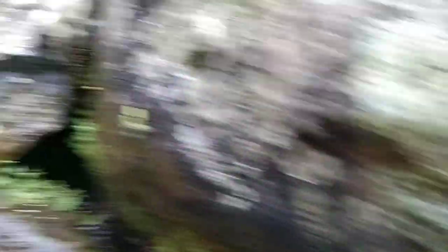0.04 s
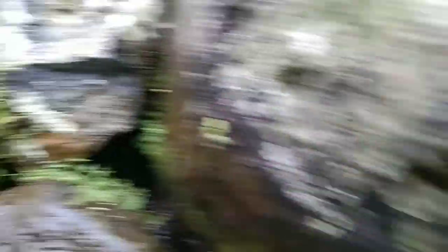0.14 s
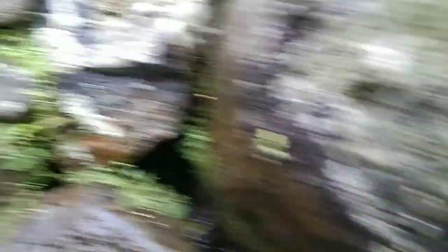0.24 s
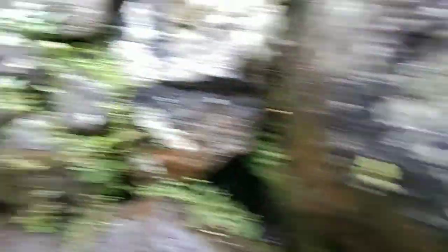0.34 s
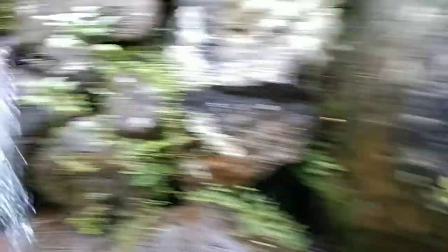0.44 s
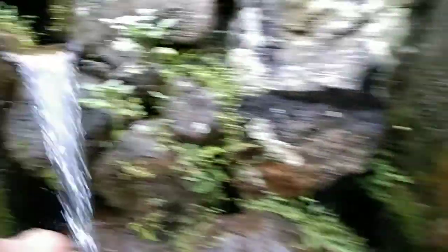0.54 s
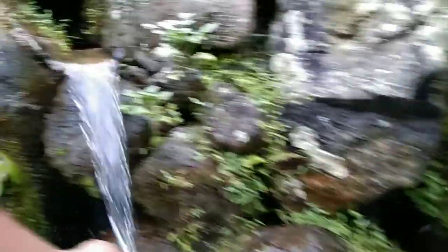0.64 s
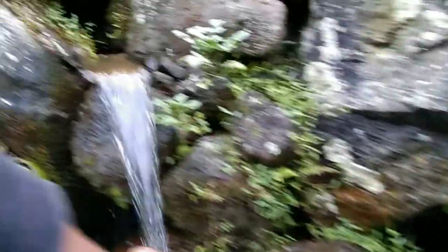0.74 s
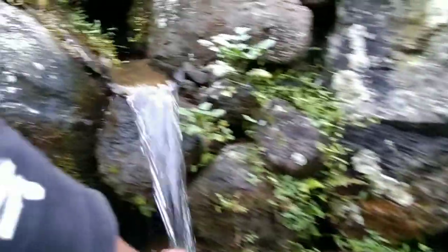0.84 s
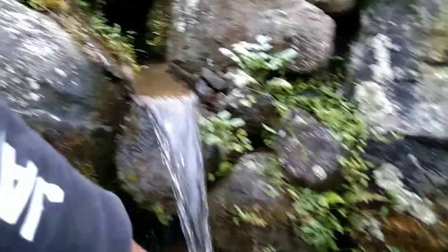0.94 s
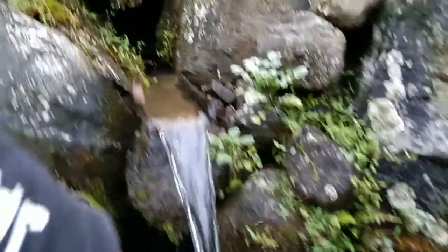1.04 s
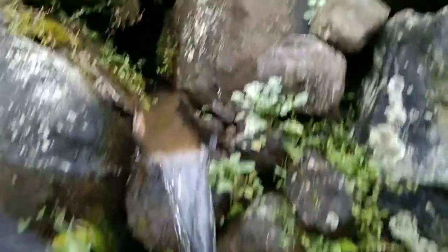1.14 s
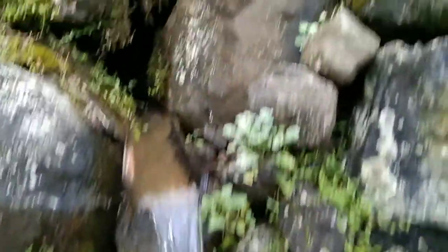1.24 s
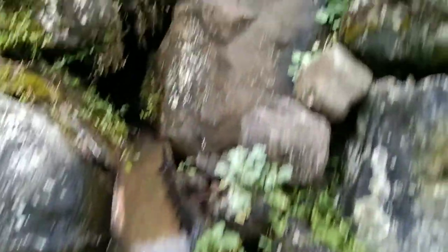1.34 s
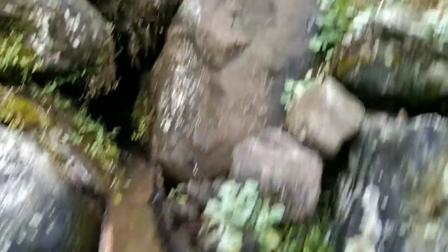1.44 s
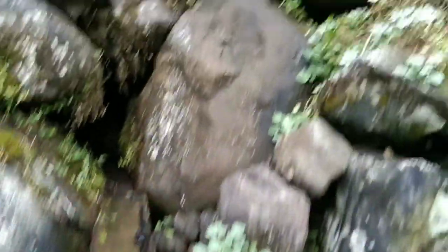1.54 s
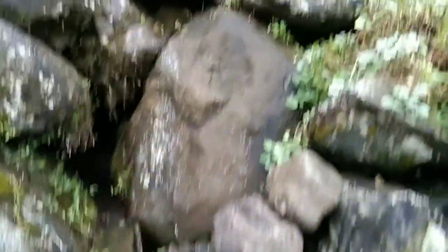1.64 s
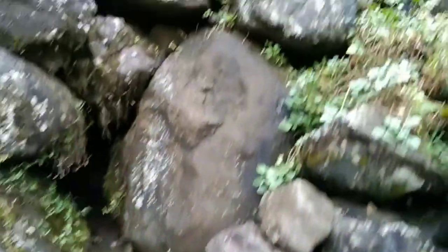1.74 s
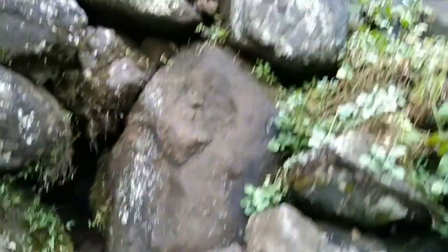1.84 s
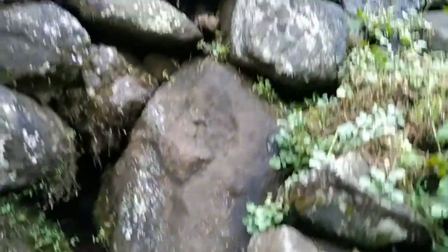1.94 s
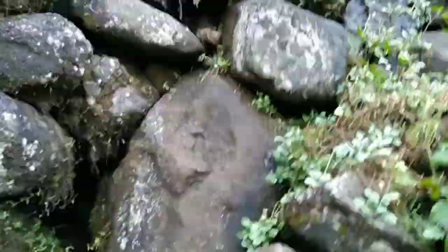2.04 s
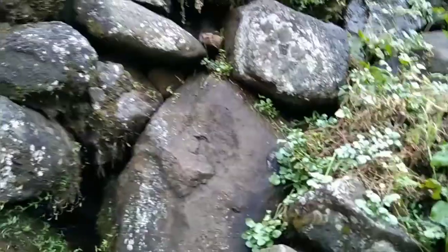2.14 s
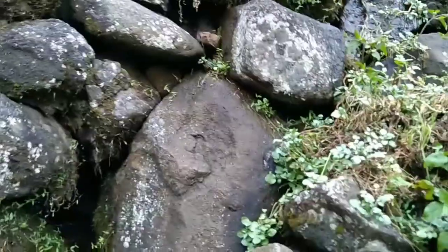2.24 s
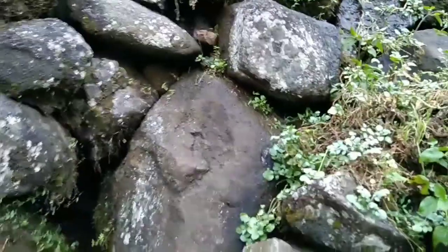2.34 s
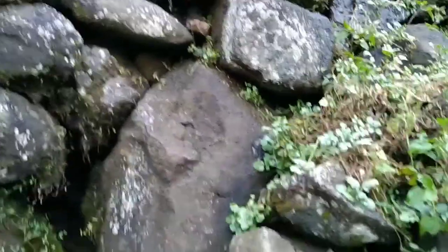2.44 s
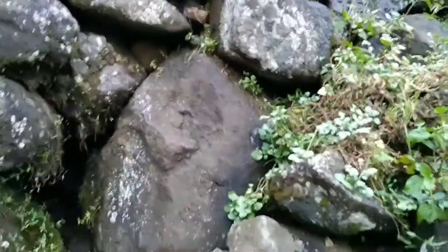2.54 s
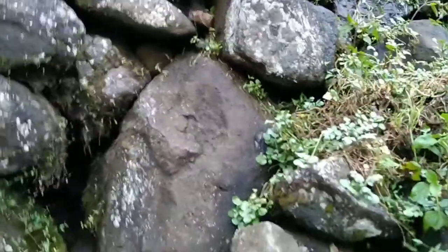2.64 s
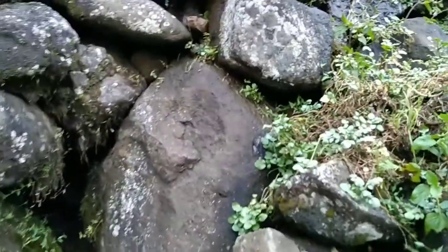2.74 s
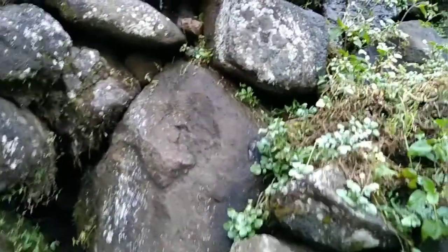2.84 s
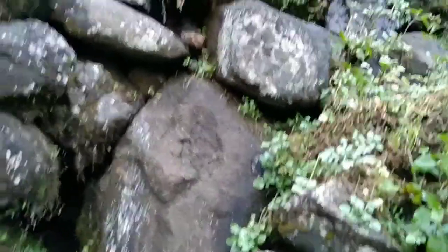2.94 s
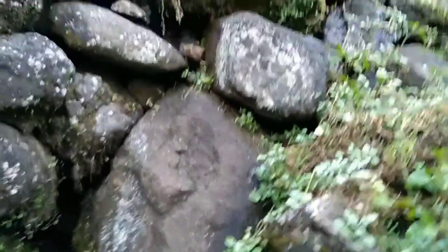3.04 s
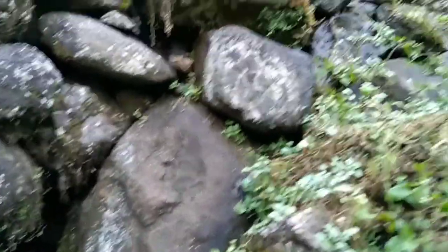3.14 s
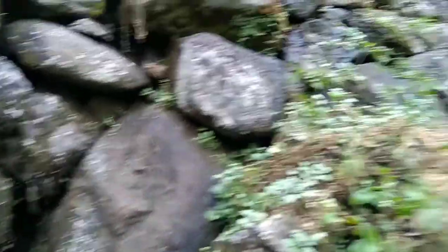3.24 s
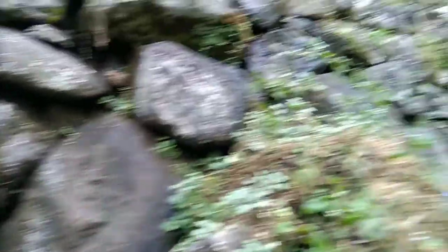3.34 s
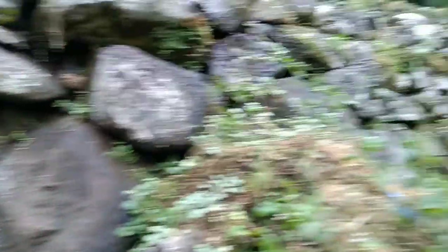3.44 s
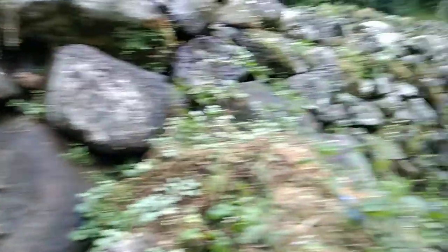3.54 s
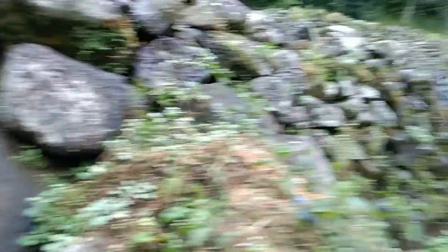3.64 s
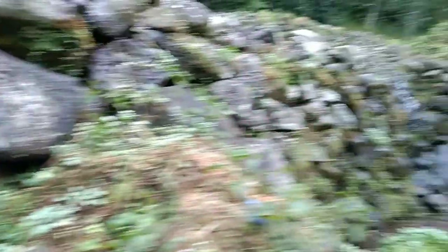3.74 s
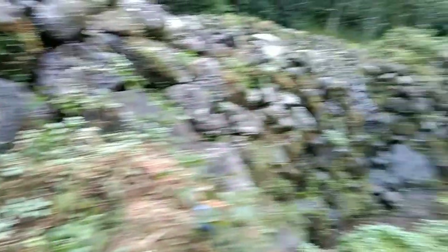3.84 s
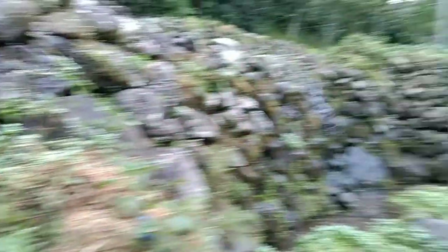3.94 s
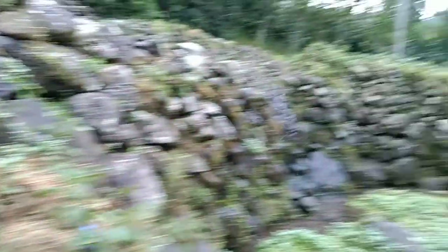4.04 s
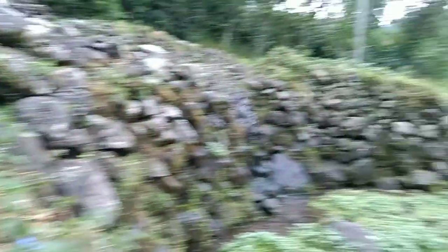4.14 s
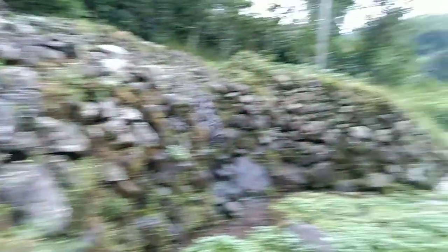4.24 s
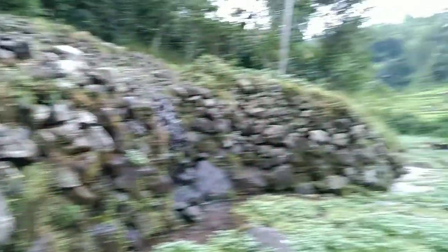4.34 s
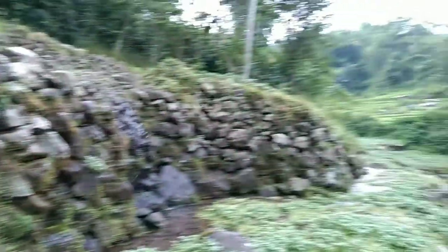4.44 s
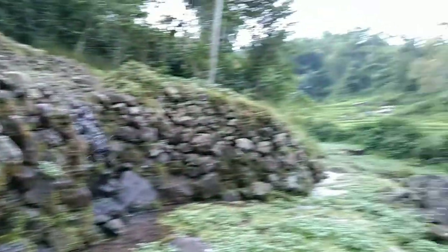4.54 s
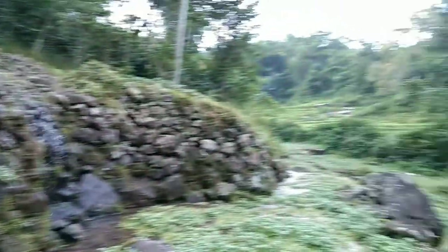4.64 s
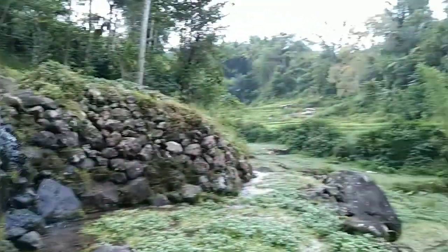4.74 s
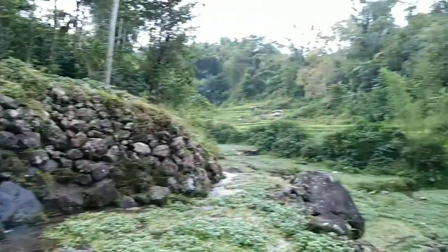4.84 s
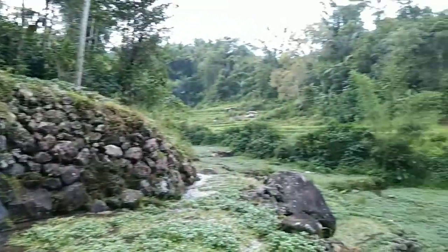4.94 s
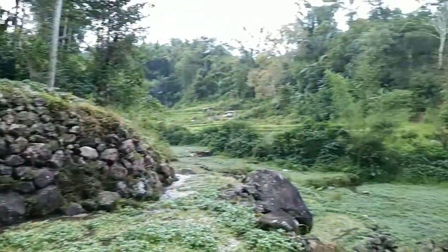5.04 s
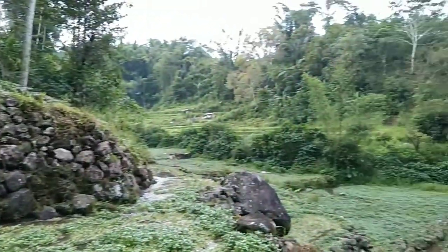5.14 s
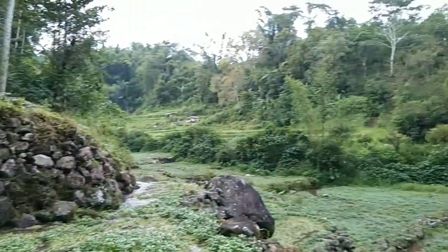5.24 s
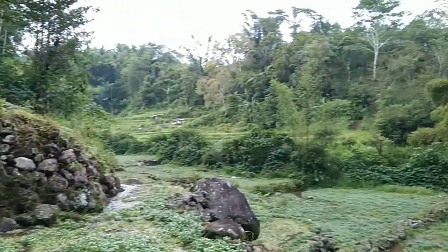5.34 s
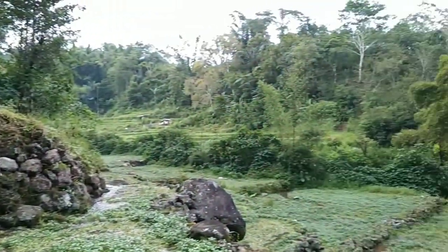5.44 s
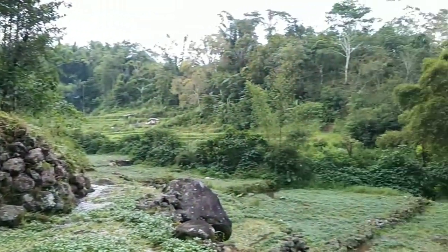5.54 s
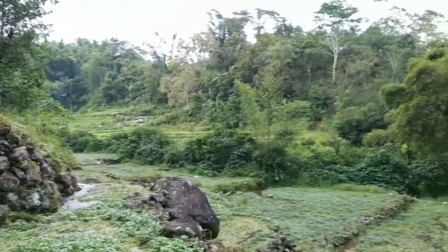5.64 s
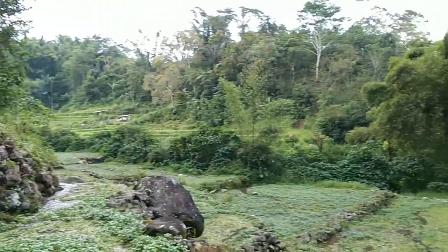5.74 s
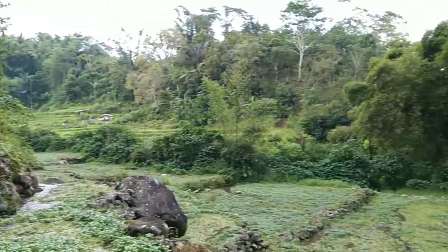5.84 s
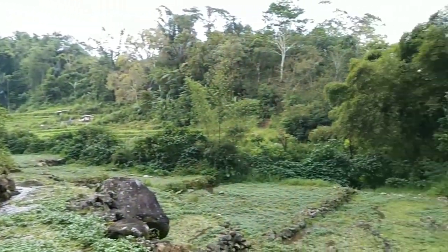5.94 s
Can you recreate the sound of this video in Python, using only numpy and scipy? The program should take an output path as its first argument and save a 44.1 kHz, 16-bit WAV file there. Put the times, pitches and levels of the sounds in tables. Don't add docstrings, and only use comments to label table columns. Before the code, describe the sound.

Stream water trickles and plinks outdoors, swells into a bright splashing rush as it passes the microphone, then thins to scattered drops.

```python
import sys
import numpy as np
from scipy import signal
from scipy.io import wavfile
from scipy.ndimage import uniform_filter1d

SR = 44100
rng = np.random.default_rng(int(sys.argv[2]) if len(sys.argv) > 2 else 0)


def store_wav(level_fs):
    pcm = np.round(np.clip(np.atleast_2d(level_fs), -1, 1) * 32767)
    wavfile.write(sys.argv[1], SR, pcm.T.astype(np.int16))


def natural_amplitude(level_db):
    exponent = np.asarray(level_db, float) / 20
    return 10 ** exponent


N = 263705
FRAME, HOP = 512, 128
HELD_DOWN_DB = 25.5

# (low edge [Hz], high edge [Hz])
REGISTERS = [
    (400, 2400),
    (2400, 5300),
    (5300, 9500),
    (9500, 15700),
]
REGISTER_HZ = [300, 1300, 3800, 7000, 12500]
# (pitch [Hz], width [Hz], level [dB])
HOLLOWS = [(576, 500, 0.58), (1260, 80, 3.5), (1900, 190, 0.5), (3800, 143, 0), (7400, 350, 0.8),
           (14400, 6100, 3), (6140, 2900, 0), (10570, 570, -0.4)]
# (time [s], rise [dB], centre [Hz])
SPATTER = [(0.117, 1, 8370), (0.206, 2.5, 6400), (0.3317, 14.5, 3550), (0.53, 13, 6660), (1.583, 4, 5100),
           (1.626, 9, 7500), (1.651, 14, 8450), (1.765, 17.5, 7400), (1.798, 15.5, 4900),
           (2.059, 12.5, 7140), (2.144, 18.5, 7950), (2.206, 13.5, 4900), (2.426, 3, 9600),
           (2.707, 12, 5600), (2.759, 8.5, 7800), (2.833, 14, 6900), (3.001, 8.5, 7600),
           (3.049, 16.5, 5500), (3.14, 13.5, 4470), (3.41, 8.5, 5900), (3.551, 14, 4700), (3.665, 15, 9550),
           (3.703, 12, 6800), (3.796, 18.5, 4850), (4.025, 20.5, 6460), (4.616, 17, 4300),
           (4.851, 5.5, 6240), (5.481, 16.5, 7160)]


def rms_one(x):
    return x / np.sqrt(np.mean(x ** 2) + 1e-20)


def frames(x):
    return signal.stft(x, SR, nperseg=FRAME, noverlap=FRAME - HOP)


def unframe(z):
    return signal.istft(z, SR, nperseg=FRAME, noverlap=FRAME - HOP)[1][:N]


def hump(hz, centre_hz, width_hz, power=2):
    return 1 / (1 + ((hz - centre_hz) / (width_hz / 2)) ** power)


def stream(fizz_share):
    rush = np.sqrt(1 - fizz_share) * rng.standard_normal(N)
    source = rush + np.sqrt(fizz_share) * fizz(per_s=70.0, spread_db=2.36, cycles=33.0, least_s=0.0041, count=36)
    below = []
    for low, _ in REGISTERS:
        below.append(signal.sosfiltfilt(signal.butter(2, low, "low", fs=SR, output="sos"), source))
    uppers = np.diff(below + [source], axis=0)
    swell_db = spatter(per_s=160.0, small_db=6.0, share=0.65, length_s=0.0012) - 1.45
    source = below[0] + np.sum(uppers * natural_amplitude(swell_db), axis=0)
    hz, s, z = frames(source)
    learned = learned_rush(hz, s)
    rise_db = excess_db(hz, s, learned)
    rise_db = rise_db + patches(hz, s, rate=4.0, depth_db=0.9249, size=3)
    rise_db = rise_db + patches(hz, s, rate=4.3, depth_db=0.4837, size=9)
    return unframe(z * learned * natural_amplitude(rise_db))


def jet_db(s):
    # (time [s], level [dB])
    jet_level = [(0, -31), (.3, -32), (.345, -25.5), (.48, -28.5), (.62, -25.5), (.73, -22.5), (.8, -20.5),
                 (1.35, -20), (1.62, -27), (1.88, -25.5), (2.05, -30), (2.3, -25.5), (2.6, -30.5),
                 (2.85, -28.5), (3.28, -32), (3.55, -28.5), (3.75, -41.5), (5.98, -43)]
    return np.interp(s, *np.transpose(jet_level))


def jet_registers(s):
    mean_db, surge_share, surge_s = -30, 0.52, 0.0085
    # (offset [dB], share of its swing)
    follows = [
        (0.44, 0.7),
        (-1.75, 1.01),
        (-12, 0.8),
    ]
    when, rise_db, centre_hz = np.transpose(SPATTER)
    since = s - when[:, None]
    dying = (since >= 0) * np.exp(-np.abs(since) / surge_s)
    surges = reach(REGISTER_HZ[2:], centre_hz) * rise_db @ dying
    offset_db, share = np.transpose(follows)[:, :, None]
    return mean_db + offset_db + share * (jet_db(s) - mean_db) + surge_share * surges


def reach(hz, centre_hz):
    octaves = np.log2(np.outer(hz, 1 / centre_hz))
    return np.exp(-(octaves / 0.96) ** 2)


def spatter(per_s, small_db, share, length_s):
    strike_s, most_db = 0.0021, 9
    # (time [s], rise [dB], centre [Hz])
    flicks = [(0.528, 21.5, 1660), (1.872, 17, 11000), (1.902, 18.5, 13000), (2.437, 24, 13200),
              (2.784, 15, 8700), (2.804, 9, 6000), (2.921, 7, 8000), (2.948, 15.5, 13500),
              (3.118, 12, 13500), (4.146, 16.5, 10370), (4.735, 21, 2550), (5.318, 25, 2700),
              (5.439, 5, 4000), (5.523, 19, 7000), (5.55, 7.5, 4300)]
    # (time [s], rise [dB])
    strikes = [(0.741, 9), (0.84, 8.5), (0.858, 7.5), (0.895, 8), (0.917, 0), (0.931, 8), (0.993, 5.5),
               (1.044, 3), (1.06, 7.5), (1.107, 9), (1.132, 7.5), (1.192, 5), (1.248, 12), (1.282, 9.5),
               (1.293, 8.5), (1.362, 9), (1.399, 8.5), (1.435, 5.5), (1.449, 8), (1.498, 6.5), (1.537, 4.5)]
    close = np.clip((jet_db(np.arange(N) / SR) + 33.0) / 14, .35, 1)
    sizes = (rng.random(N) < per_s / SR) * small_db * close * np.minimum(rng.exponential(1, N), 2.4)
    small = sizes * reach(REGISTER_HZ[1:], 3000 * 2 ** rng.uniform(0, 5.6, N))
    listed = np.zeros_like(small)
    when, rise_db, centre_hz = np.transpose(np.vstack([SPATTER, flicks]))
    rises = share * rise_db * reach(REGISTER_HZ[1:], centre_hz)
    np.add.at(listed.T, (when * SR).astype(int), rises.T)
    when, rise_db = np.transpose(strikes)
    struck = np.zeros_like(small)
    struck[1:, (when * SR).astype(int)] = rise_db
    lengths_s = np.array([length_s, length_s, strike_s])[:, None, None]
    t = np.arange(int(.012 * SR)) / SR / lengths_s
    small, listed, struck = signal.fftconvolve([small, listed, struck], t * np.exp(1 - t), axes=2)[:, :, :N]
    return np.maximum(most_db * np.tanh(small / most_db), listed + struck)


def fizz(per_s, spread_db, cycles, least_s, count):
    out = np.zeros(N)
    for hz in np.geomspace(350, 15500, count):
        sizes = natural_amplitude(spread_db * np.minimum(rng.exponential(1, N), 3))
        clicks = (rng.random(N) < per_s / SR) * sizes * rng.choice([-1, 1], N)
        r = np.exp(-np.log(1000) / (max(cycles / hz, least_s) * SR))
        w = 2 * np.pi * hz / SR
        ring = [(1 - r * r) / 2, 0, (r * r - 1) / 2], [1, -2 * r * np.cos(w), r * r]
        out += signal.lfilter(*ring, rms_one(clicks) + 1e-18)
    return rms_one(out)


def excess_db(hz, s, learned):
    fully_open_db, leverage, bass_rise_db = 5.5, 0.22, 3
    # (time [s], pitch [Hz], level [dB])
    gurgle_path = [(0, 1900, -29), (0.301, 1900, -28.5), (.42, 1440, -38), (.53, 1700, -31),
                   (.75, 1900, -28), (.82, 1360, -36), (1.12, 1040, -28.5), (1.52, 1334, -40),
                   (2.2, 1780, -47), (2.75, 1680, -41.5), (3.4, 1290, -39), (3.55, 1900, -41.5),
                   (4.0, 1750, -39.5), (4.601, 2140, -38), (5.4, 2200, -37), (5.55, 1900, -39.5),
                   (5.98, 2770, -44.5)]
    # (time [s], pitch [Hz], depth [dB])
    notch_path = [(0, 2250, -1.5), (.6, 1940, -0.5), (1.3, 2360, 1.5), (1.6, 2220, -1.5),
                  (1.999, 2490, 2.5), (3.6, 2880, 1), (4.201, 3440, 1), (6, 3520, -0.5)]
    gurgle_s, gurgle_hz, gurgle_db = np.transpose(gurgle_path)
    passed = [np.interp(s, gurgle_s, gurgle_db)]
    passed += list(jet_registers(s))
    passed[-1] = passed[-1] + 0.36 * nearness_db(s)
    rises = [np.full(len(s), bass_rise_db)]
    for (low, high), passed_db in zip(REGISTERS, passed):
        expected = np.sum(learned[(hz >= low) & (hz < high)] ** 2, axis=0) / len(hz)
        over = np.maximum(passed_db - 10 * np.log10(expected), -26) - fully_open_db
        rises.append(fully_open_db + np.maximum(over, leverage * over))
    place = np.interp(np.log(hz + 1), np.log(REGISTER_HZ), np.arange(len(rises)))
    shares = np.clip(1 - np.abs(place[:, None] - np.arange(len(rises))), 0, 1)
    hollows = sum(db * hump(hz, at_hz, width_hz) for at_hz, width_hz, db in HOLLOWS)
    gurgle = 3 * hump(hz[:, None], np.interp(s, gurgle_s, gurgle_hz), width_hz=178)
    when, notch_hz, depth_db = np.transpose(notch_path)
    notch = np.interp(s, when, depth_db) * hump(hz[:, None], np.interp(s, when, notch_hz), 1050, power=4)
    return shares @ np.array(rises) + hollows[:, None] + gurgle - notch + rivulets(hz, s) - 1.3


def rivulets(hz, s):
    # (time [s], length [s], pitch [Hz], rise [dB])
    near = [(0.02, 0.061, 2480, 7), (0.113, 0.1, 2730, 5.5), (0.186, 0.1, 4510, 8.5), (0.273, 0.1, 7620, 8),
            (0.29, 0.52, 13100, 6), (0.31, 0.045, 3500, 5.5), (0.335, 0.071, 4470, 4),
            (0.325, 0.07, 4940, 9.5), (0.315, 0.092, 4400, 5), (0.32, 0.13, 3850, 6),
            (0.339, 0.1, 2740, 22), (0.329, 0.084, 3080, 5), (0.436, 0.22, 7160, 5), (0.596, 0.08, 5900, 5),
            (1.52, 0.17, 4050, 5), (1.518, 0.15, 8500, -9), (1.516, 0.18, 3500, 12.5),
            (1.493, 0.19, 4850, 7.5), (1.497, 0.39, 6040, 8), (1.49, 0.27, 7220, 5.5),
            (1.565, 0.19, 3230, 9.5), (1.594, 0.33, 7690, 6), (1.624, 0.12, 5370, 6),
            (1.768, 0.31, 3700, 10.5), (1.771, 0.21, 8268, 4), (1.773, 0.32, 9080, 8),
            (1.875, 0.34, 4170, 8.5), (1.815, 0.32, 4540, 4), (1.832, 0.31, 10830, 7.5),
            (1.85, 0.15, 6860, 6.5), (1.852, 0.13, 6370, 8), (2.053, 0.14, 3640, 1.5),
            (2.09, 0.22, 4750, 6.5), (2.103, 0.16, 3780, 2), (2.143, 0.21, 10100, 2),
            (2.147, 0.24, 6900, 7), (2.153, 0.15, 7200, 0), (2.151, 0.214, 7665, -2),
            (2.154, 0.097, 4240, 2.5), (2.23, 0.28, 6300, 5.5), (2.244, 0.26, 14987, 6)]
    leaving = [(2.32, 0.07, 2900, 6.3), (2.331, 0.18, 11730, 10), (2.36, 0.144, 12900, 17),
               (2.369, 0.17, 5930, 9.6), (2.405, 0.15, 3690, 10), (2.424, 0.15, 7180, 8.2),
               (2.453, 0.057, 4160, 5), (2.491, 0.039, 6600, 10.6), (2.493, 0.031, 4670, 12),
               (2.653, 0.1, 7340, 4.6), (2.662, 0.289, 5960, 5.5), (2.707, 0.3, 3675, 12),
               (2.723, 0.049, 5360, 5.3), (2.723, 0.289, 12500, 7.2), (2.761, 0.083, 8790, 10.4),
               (2.761, 0.2, 6930, 7.7), (2.78, 0.073, 8800, 8.1), (2.797, 0.087, 4700, 2.1),
               (2.799, 0.16, 11540, 6.5), (2.801, 0.14, 6180, 2.9), (2.86, 0.067, 3960, 6.9),
               (2.894, 0.289, 13264, 2.1), (2.926, 0.1, 14600, 3.8), (2.941, 0.066, 15100, 7.7),
               (2.99, 0.28, 4850, 2.02), (2.996, 0.069, 4220, 3.7), (2.999, 0.11, 7500, 2.4),
               (3.001, 0.089, 8440, 6.1), (3.054, 0.057, 8750, 6.5), (3.109, 0.081, 3720, 19),
               (3.115, 0.11, 6150, 5.8), (3.118, 0.082, 2830, 5.3), (3.121, 0.069, 4120, 9.3),
               (3.132, 0.114, 7430, 6.5), (3.141, 0.15, 7100, 3.6), (3.333, 0.05, 3850, 7),
               (3.359, 0.076, 7407, 3.4), (3.385, 0.16, 5300, 8.2), (3.388, 0.061, 4306, 4),
               (3.388, 0.047, 6340, 6.5), (3.405, 0.042, 5860, 4.1), (3.423, 0.23, 13000, 2.3),
               (3.449, 0.093, 4700, 3.6), (3.489, 0.16, 5100, 5.6), (3.521, 0.098, 3140, 4.4),
               (3.53, 0.15, 3780, 8.7), (3.55, 0.079, 7600, 5), (3.55, 0.073, 4260, 6.7),
               (3.55, 0.11, 11000, 5.2), (3.605, 0.097, 13960, 13)]
    far = [(1.594, 0.11, 1300, 5.5), (2.204, 0.067, 1800, 9.2), (2.262, 0.078, 1590, 5.8),
           (2.265, 0.079, 1245, 9.7), (2.39, 0.047, 580, 6.9), (2.475, 0.06, 844, 4.4),
           (2.57, 0.2, 1790, 4.3), (2.8, 0.04, 2500, 9), (2.851, 0.086, 650, 6.7), (3.23, 0.032, 1750, 3),
           (3.373, 0.017, 1280, 1.7), (3.492, 0.056, 1940, 9.6), (3.791, 0.14, 5250, 7.9),
           (3.794, 0.076, 4030, 8.2), (3.794, 0.14, 4450, 3.4), (3.799, 0.098, 5700, 3.6),
           (3.94, 0.065, 1285, 7.8), (4.09, 0.057, 5900, 7.5), (4.1, 0.06, 1120, 4.7),
           (4.241, 0.061, 1580, 8.6), (4.241, 0.085, 1119, 9.9), (4.241, 0.091, 860, 4.1),
           (4.32, 0.07, 5160, 5.5), (4.47, 0.11, 510, 7.2), (4.528, 0.048, 2100, 4.4),
           (4.56, 0.057, 516, 3.3), (4.585, 0.054, 5050, 9.4), (4.726, 0.054, 533, 7.5),
           (4.729, 0.06, 775, 4), (4.732, 0.05, 2400, 6.3), (4.781, 0.085, 5930, 5.1),
           (4.822, 0.1, 2842, 5.3), (4.862, 0.15, 510, 6.2), (5.094, 0.055, 2000, 2.5),
           (5.315, 0.055, 2700, 6.2), (5.36, 0.066, 5960, 7.7), (5.478, 0.048, 1830, 9.7),
           (5.48, 0.08, 5700, 7.3), (5.53, 0.05, 3700, 2.3), (5.64, 0.057, 2000, 10),
           (5.73, 0.075, 1750, 6.9), (5.86, 0.046, 2750, 7.3)]
    share, edge_s, flicker = 0.76, 0.0028, 0.52
    start, length, pitch_hz, rise_db = np.transpose(np.vstack([near, leaving, far]))[:, :, None]
    inside_s = np.minimum(s - start, (start + length - s) / 3)
    running = np.clip(inside_s / edge_s + 1, 0, 1)
    drop_by_drop = uniform_filter1d(rng.standard_normal(running.shape), size=3, axis=1)
    running *= 1 + flicker * rms_one(drop_by_drop)
    band = np.exp(-((hz - pitch_hz) / (76.5 + 0.012 * pitch_hz)) ** 2)
    away = np.clip((-23 - jet_db(s)) / 4.4, (hz < REGISTERS[0][1])[:, None], 1)
    return np.minimum(band.T @ (share * rise_db * running), 8.0) - 1.744 * away


def patches(hz, s, rate, depth_db, size):
    keep = np.exp(-2 * np.pi * rate * HOP / SR)
    chance = uniform_filter1d(rng.standard_normal((len(hz), len(s) + 200)), size=size, axis=0)
    drift = signal.lfilter([1], [1, -2 * keep, keep ** 2], chance, axis=1)[:, 200:]
    return depth_db * rms_one(drift)


def plops(rows, cycles, rise, rough, gain_db):
    out = np.zeros(N + SR)
    partners = rng.uniform(-0.99, 1, (len(rows), 2))
    for (s, peak_db, hz), (apart, turn) in zip(rows, partners):
        turns = np.arange(int(cycles / hz * SR)) * hz / SR
        shape = (1 - np.exp(-turns / rise)) * natural_amplitude(-60 * turns / cycles)
        phase = 2 * np.pi * turns * (1 + 0.0002 * turns)
        tone = np.sin(phase) + rough * np.sin(phase * (1 + 0.073 * apart) + np.pi * turn)
        ring = shape * tone
        start = round(s * SR)
        out[start:start + len(turns)] += natural_amplitude(peak_db + gain_db) * ring / np.max(np.abs(ring))
    return out[:N]


def drops():
    # (time [s], peak [dB], pitch [Hz])
    drop_rows = [(.2062, -13.5, 4030), (.3315, -17.5, 3580), (.3646, -11.5, 4900), (.5264, -13, 4350),
                 (.841, -15, 4230), (.9792, -9.5, 3220), (1.057, -10, 2704), (1.134, -8, 3800),
                 (1.247, -5, 3570), (1.4348, -7, 4670), (1.8246, -15, 3470), (1.8735, -32, 3700),
                 (2.0566, -12, 3800), (2.08, -14, 3860), (2.096, -17, 3800), (2.1553, -16, 3580),
                 (2.2057, -9.5, 4260), (2.4572, -18, 3660), (2.8019, -17, 3674), (2.947, -17.5, 3690),
                 (3.0488, -14.5, 3975), (3.1411, -15.5, 3860), (3.3312, -19, 3980), (3.5502, -19, 3800),
                 (3.7946, -25, 3990), (4.3219, -16.5, 5250), (4.6122, -20.5, 3250), (4.7339, -19.5, 2730),
                 (4.8721, -20, 3120), (5.4114, -22, 2690), (5.5501, -25, 3640), (5.862, -23.5, 2720)]
    # (time [s], peak [dB], pitch [Hz])
    tick_rows = [(0.119, -13.5, 6600), (0.28, -19, 7550), (0.528, -14, 6730), (0.745, -10, 7700),
                 (0.916, -6, 7900), (1.2482, -9, 7520), (1.284, -6, 7400), (1.359, -2, 7550),
                 (1.582, -8.5, 5940), (1.6291, -9, 6700), (1.653, -11, 7300), (1.7127, -10, 6800),
                 (1.7663, -20, 7400), (1.801, -8, 7440), (1.857, -9, 5990), (2.146, -22, 8490),
                 (2.161, -11, 6870), (2.247, -10, 6770), (2.487, -12.5, 6840), (2.761, -10, 7150),
                 (2.8335, -14.5, 6500), (2.9094, -10.5, 6980), (2.9998, -12, 7450), (3.1837, -12, 7070),
                 (3.407, -12, 5530), (3.569, -13, 7100), (3.702, -12.5, 6560), (4.029, -16.5, 7500),
                 (4.8495, -10.5, 7320), (5.438, -22, 4400), (5.4811, -14.5, 5250), (5.52, -17, 8130)]
    out = plops(drop_rows, cycles=71.0, rise=1.57, rough=0.67, gain_db=-4.0)
    out += plops(tick_rows, cycles=118.0, rise=1.4, rough=0.86, gain_db=-5.0)
    return out + cracks(np.vstack([drop_rows, tick_rows]), gain_db=-10.5)


def cracks(rows, gain_db):
    length_s = 0.00072
    s, peak_db, _ = np.transpose(rows)
    clicks = np.zeros(N)
    clicks[(s * SR).astype(int)] = natural_amplitude(peak_db + gain_db)
    fading = signal.lfilter([1], [1, -np.exp(-1 / (length_s * SR))], clicks + 1e-18)
    bursts = fading * rng.standard_normal(N)
    return signal.sosfilt(signal.butter(2, [2600, 10000], "band", fs=SR, output="sos"), bursts)


def bubbles():
    # (time [s], peak [dB], pitch [Hz])
    bubble_rows = [(0.0288, -26, 2120), (0.0927, -30, 1900), (0.172, -23.5, 2060), (0.2284, -20, 1720),
                   (0.287, -24, 1294), (0.342, -20, 1735), (0.3614, -18, 1560), (0.3972, -22.5, 1333),
                   (0.5312, -19, 1390), (0.6015, -23, 1300), (0.6484, -19, 1900), (0.806, -28, 1260),
                   (1.045, -21.5, 1880), (1.1372, -22, 1260), (1.2391, -21.5, 1700), (1.4104, -26, 1240),
                   (1.5963, -38, 1330), (1.9764, -29, 1580), (2.2059, -24, 1916), (2.65, -40, 1695),
                   (3.232, -24.5, 1725), (3.3743, -27, 1248), (3.496, -24.5, 1892), (4.2398, -27, 1610),
                   (4.4593, -31, 1076), (5.0911, -24.5, 2010), (5.1287, -23, 2070), (5.2465, -23.5, 2020),
                   (5.5208, -27, 1206), (5.7683, -25.5, 2100)]
    # (time [s], peak [dB], pitch [Hz])
    gulp_rows = [(0.17, -33, 1026), (0.219, -29, 600), (0.432, -34.5, 377), (0.531, -32, 595),
                 (0.627, -32.5, 586), (0.941, -31.5, 732), (1.036, -32, 726), (1.063, -30.5, 1000),
                 (1.116, -27, 1006), (1.333, -32, 642), (1.383, -30.5, 526), (1.708, -33.5, 810),
                 (2.171, -34, 540), (2.397, -32.5, 568), (2.48, -34.5, 860), (2.858, -29, 636),
                 (2.988, -31, 773), (3.096, -37, 504), (3.44, -34.5, 935), (3.751, -39, 541),
                 (3.881, -33.5, 537), (4.263, -33.5, 752), (4.34, -34.5, 614), (4.567, -35, 501),
                 (4.724, -25.5, 559), (4.858, -36, 553), (4.909, -32.5, 535), (5.138, -51, 682),
                 (5.268, -32, 813), (5.37, -33.5, 580)]
    # (time [s], peak [dB], pitch [Hz])
    glug_rows = [(2.056, -41, 333), (2.719, -41, 328), (2.813, -40, 254), (3.69, -47.5, 376),
                 (4.661, -40, 258.6), (5.47, -45, 244)]
    out = plops(bubble_rows, cycles=49.5, rise=0.33, rough=0.2, gain_db=-0.5)
    out += plops(gulp_rows, cycles=52.7, rise=0.15, rough=0.67, gain_db=2.0)
    return out + plops(glug_rows, cycles=24.7, rise=2.3, rough=0.18, gain_db=8.0)


def strays(first, count):
    when, which, detune, size = rng.random((count, 4)).T
    s = when * N / SR
    hollow_hz = np.transpose(HOLLOWS)[0][first + (which * 3).astype(int)]
    hz = hollow_hz * (1 + 0.206 * (2 * detune - 1))
    swing_db = jet_db(s) + 30
    peak_db = -23.5 + 0.19 * swing_db + 2.4 * np.log(size + 0.15)
    return np.transpose([s, peak_db, hz])


def drips():
    # (time [s], peak [dB], pitch [Hz])
    drip_rows = [(2.231, -23.5, 558), (4.0, -12.5, 4670), (4.399, -20, 2420), (4.5, -13, 4200),
                 (5.69, -17.5, 2600), (5.902, -20, 2670)]
    low = plops(strays(first=0, count=230), cycles=21.0, rise=2.4, rough=0.46, gain_db=-18.0)
    high_rows = np.vstack([strays(first=2, count=280), drip_rows])
    return low + plops(high_rows, cycles=54.0, rise=0.26, rough=0.34, gain_db=-9.0)


def bumps():
    # (time [s], peak [dB], pitch [Hz])
    bump_rows = [(0.166, -51.5, 117), (0.429, -51, 106), (0.581, -53, 121), (0.803, -55.5, 96.5),
                 (0.888, -49, 136), (1.763, -53, 106)]
    return plops(bump_rows, cycles=4.9, rise=1.2, rough=1.0, gain_db=20.5)


def scene():
    water = stream(fizz_share=0.3)
    water += drops() + bubbles() + drips() + bumps()
    return water[None]


def nearness_db(s):
    # (time [s], extra level at 12 kHz [dB])
    nearness = [(0, -47), (.3, 10), (.7, 1.5), (1.6, 2.5), (2.5, -5.5), (3.0, 4.5), (3.6, 2), (3.9, 0),
                (6, -16)]
    return np.interp(s, *np.transpose(nearness))


def learned_rush(hz, s):
    # (pitch [Hz], level per Hz [dB])
    rush = [(40, -9), (90, -2), (200, -1.5), (800, -3), (1700, -2), (2400, -3), (5600, -2.5), (7700, 0),
            (9000, -10), (11100, -19.5), (14700, -27), (15900, -29)]
    at, level_db = np.transpose(rush)
    shape = rms_one(natural_amplitude(np.interp(np.log(hz + 1), np.log(at), level_db)))
    bright = np.clip(hz / 12000, 0, 1.3) ** 2
    held_db = -54
    return natural_amplitude(held_db + HELD_DOWN_DB + np.outer(bright, nearness_db(s).clip(0))) * shape[:, None]


def suppress(x, open_db, hold_db, fast_s, slow_s, release_db_s):
    ajar_db, ajar_margin_db, ajar_s, leak_db = -5.5, 3.5, 0.016, -59
    hz, s, z = frames(x)
    window = signal.get_window("hann", FRAME)
    learned = learned_rush(hz, s)
    ratio = np.abs(z) ** 2 / (learned ** 2 * np.sum(window ** 2) / np.sum(window) ** 2)
    wanted = []
    for margin_db, smooth_s in ((open_db, fast_s), (hold_db, slow_s), (ajar_margin_db, ajar_s)):
        keep = np.exp(-HOP / SR / smooth_s)
        average = signal.lfilter([1 - keep], [1, -keep], ratio, axis=1)
        wanted.append(np.clip(1 - natural_amplitude(margin_db) ** 2 / (average + 1e-9), 0, 1))
    gain, fade = wanted[0].copy(), natural_amplitude(-release_db_s * HOP / SR)
    for k in range(1, len(s)):
        held = np.clip(wanted[1][:, k], fade * gain[:, k - 1], gain[:, k - 1])
        gain[:, k] = np.maximum(gain[:, k], held)
    opening = np.maximum(gain ** 1.636, natural_amplitude(ajar_db) * wanted[2])
    filler = frames(rng.standard_normal(N))[2] * learned * natural_amplitude(-HELD_DOWN_DB)
    return unframe(z * np.hypot(opening, natural_amplitude(leak_db)) + filler * (1 - gain))


def band_limit(x):
    return signal.sosfilt(signal.butter(12, 15960, fs=SR, output="sos"), x)


def record(dry):
    cleaned = suppress(dry[0], open_db=8.5, hold_db=1.5, fast_s=0.0031, slow_s=0.021, release_db_s=358.0)
    thin = signal.sosfilt(signal.butter(3, 58, "high", fs=SR, output="sos"), cleaned)
    thin = signal.sosfilt(signal.cheby2(20, 70, 15900, fs=SR, output="sos"), thin)
    return band_limit(thin[None])


dry = scene()
out = record(dry)
store_wav(out)
```